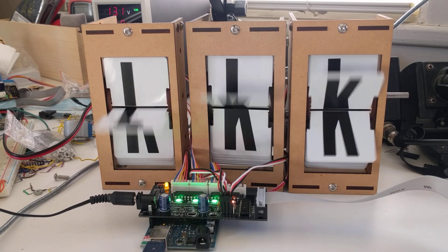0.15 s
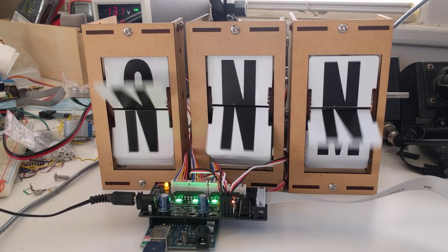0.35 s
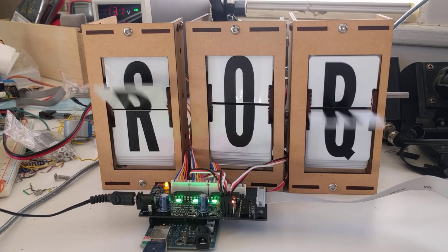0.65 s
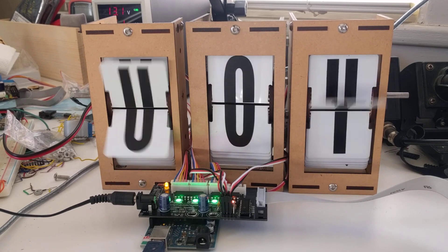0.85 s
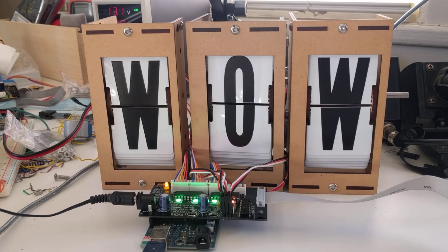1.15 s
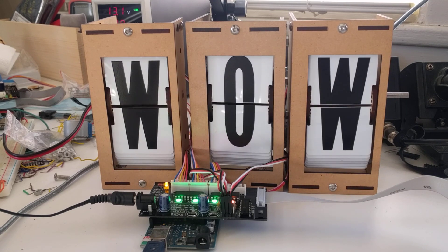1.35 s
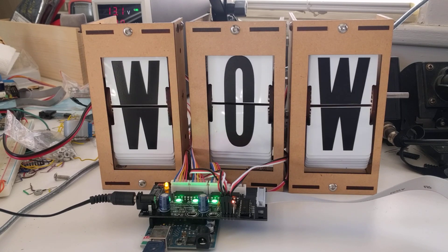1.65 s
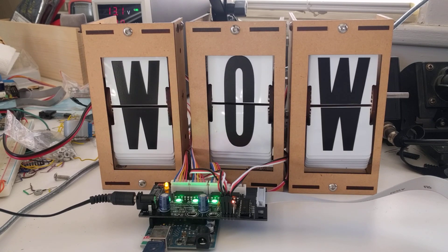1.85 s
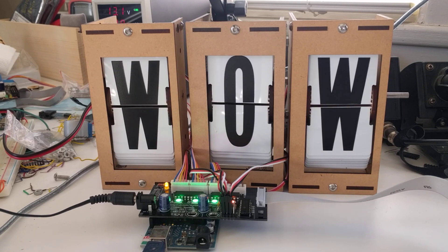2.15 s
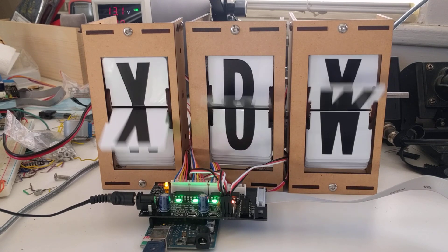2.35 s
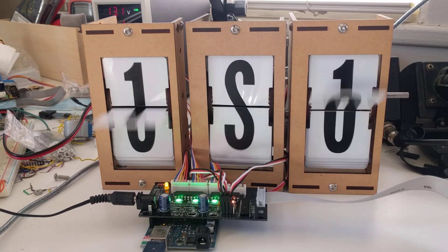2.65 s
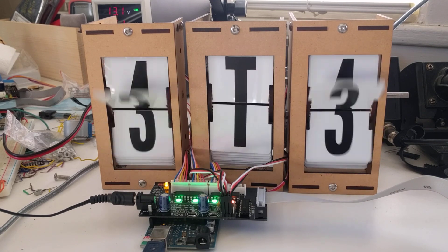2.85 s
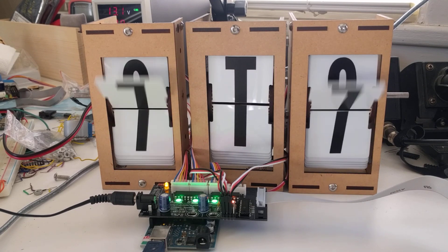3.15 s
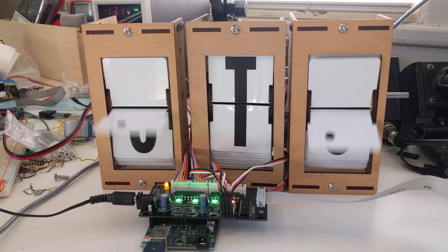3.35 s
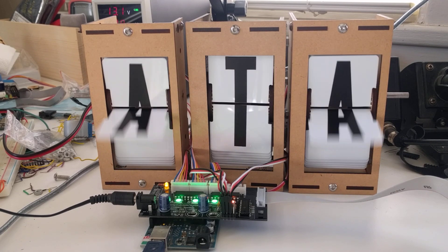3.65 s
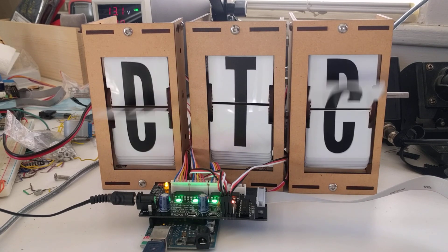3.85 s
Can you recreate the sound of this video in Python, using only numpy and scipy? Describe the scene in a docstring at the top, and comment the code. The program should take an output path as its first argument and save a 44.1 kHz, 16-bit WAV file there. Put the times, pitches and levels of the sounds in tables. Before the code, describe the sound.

Fast, crisp split-flap clatter runs down to near silence, then clacks and whirs back up

```python
"""Split-flap modules on a workbench

Three split-flap modules in fibreboard cases in a small room, the microphone close by.
Stiff plastic flaps slip off a catch: each slap is a contact noise with ringing modes and a case knock.
The motors hum in case resonances; loose flaps rattle on the drums, made of dense random ticks.
The modules run down, rest for a second, then groan and clack into motion and spin again."""
import sys
import numpy as np
from scipy import signal
from scipy.fft import rfft, irfft, next_fast_len
from scipy.io import wavfile
from scipy.ndimage import uniform_filter1d, map_coordinates

SR = 44100
rng = np.random.default_rng(int(sys.argv[2]) if len(sys.argv) > 2 else 0)


def transcribe(signal):
    """Save signal, clipped to [-1, 1], as a 16-bit WAV file at the path in sys.argv[1]."""
    frames = np.atleast_2d(signal).T
    limited = np.clip(frames, -1, 1)
    pcm = np.round(limited * 32767).astype(np.int16)
    wavfile.write(sys.argv[1], SR, pcm)


N = 176400  # samples: 4 s


def amp(db):
    """Decibels to gain."""
    return 10 ** (np.asarray(db) / 20)


def unit(x):
    """Scale to rms 1."""
    return x / np.sqrt(np.mean(x ** 2) + 1e-20)


def along(points, hz):
    """Read (frequency, value) points on a log frequency axis."""
    f, v = np.transpose(points)
    return np.interp(np.log(hz + 1), np.log(f + 1), v)


def wobble(rate):
    """A smooth random curve with rate knots a second."""
    knots = rng.standard_normal(int(N * rate / SR) + 4)
    return map_coordinates(knots, [np.arange(N) * rate / SR])


def filtered(x, response):
    """Multiply the spectrum of x by a response of frequency."""
    m = next_fast_len(N + SR // 2)
    return irfft(rfft(x, m) * response(np.fft.rfftfreq(m, 1 / SR)), m)[:N]


def coloured(x, points):
    """Filter x by the given colour and scale it to rms 1."""
    return unit(filtered(x, lambda hz: amp(along(points, hz))))


def hit_time(size=4096):
    """Time axis of one blow, in seconds."""
    return np.arange(size) / SR


def fade(t, t60):
    """Exponential decay by 60 dB in t60 seconds, starting at t = 0."""
    return (t >= 0) * np.exp(-np.log(1000) * np.abs(t) / t60)


def burst(t, t60):
    """Noise that dies away, as from a rough contact."""
    return rng.standard_normal(len(t)) * fade(t, t60)


def impulse(t, s):
    """One hard contact at time s, as a windowed sinc."""
    x = (t - s) * SR
    return np.sinc(x) * np.exp(-(x / 10) ** 2)


def body(x, points):
    """Pass a short blow through a causal (minimum-phase) colour of unit power."""
    hz = np.fft.rfftfreq(len(x), 1 / SR)
    cepstrum = irfft(np.log(unit(amp(along(points, hz))) + 1e-6))
    # fold the cepstrum onto positive time
    cepstrum[1:len(x) // 2] *= 2
    cepstrum[len(x) // 2 + 1:] = 0
    return irfft(rfft(x) * np.exp(rfft(cepstrum)))


def add(track, s, db, blow, size=140):
    """Add a blow at s seconds, its first size samples having the given rms level."""
    part = track[round(s * SR):][:len(blow)]
    part += amp(db) * blow[:len(part)] / np.sqrt(np.mean(blow[:size] ** 2))


# Colour of the quiet room's noise: pitch_hz, level_db
AIR_COLOUR = [(25, -25.5), (59, -2), (82, -16.5), (119, -7), (152, -14), (233, -13.5), (567, -23),
              (762, -25.5), (8350, -36.5), (15500, -31.5)]
AIR_DB = -60.5
HUM_HZ, HUM_DB = 58.7, -66.5  # mean pitch; peak level of the fundamental


def air():
    """Room noise with a low hum and its octave, their phase drifting slowly."""
    phase = 2 * np.pi * HUM_HZ * np.arange(N) / SR + wobble(2.0)
    hum = np.sin(phase) + .5 * np.sin(2 * phase)
    return amp(AIR_DB) * coloured(rng.standard_normal(N), AIR_COLOUR) + amp(HUM_DB) * hum


# Decay of the small room: pitch_hz, t60_s
ROOM_DECAY = [(100, .4), (1500, 0.68), (4000, 0.47), (8500, 0.5)]
ROOM_DB, ROOM_RISE_S = -17, 0.0052


def room(x, count=16):
    """Diffuse tail, a new one for each stretch of sound; each frequency dies at its own speed."""
    out = np.zeros(N + SR)
    for part in np.array_split(np.arange(N), count):
        hz, t, z = signal.stft(rng.standard_normal(SR // 2), SR, nperseg=256)
        decay = fade(t, along(ROOM_DECAY, hz)[:, None])
        tail = signal.istft(z * decay, SR, nperseg=256)[1]
        tail *= 1 - np.exp(-np.arange(len(tail)) / SR / ROOM_RISE_S)
        wet = signal.fftconvolve(x[part], tail / np.linalg.norm(tail))
        out[part[0]:part[0] + len(wet)] += wet
    return out[:N]


TICKS_PER_S, TICK_SPREAD_DB, TICK_T60_S = 1000, 4, 0.006  # mean rate; standard deviation; decay


def ticks():
    """A dense random train of tiny scraping contacts of uneven size."""
    sizes = (rng.random(N) < TICKS_PER_S / SR) * amp(TICK_SPREAD_DB * rng.standard_normal(N))
    power = signal.fftconvolve(sizes ** 2, fade(hit_time(), TICK_T60_S) ** 2)[:N]
    return np.sqrt(np.abs(power)) * rng.standard_normal(N)


def patchy(x, depth_db, size):
    """Let bands swell and fade at random; a short frame gives brief, wide patches."""
    z = signal.stft(x, nperseg=size)[2]
    field = uniform_filter1d(rng.standard_normal(z.shape), size=4, axis=0)
    field = uniform_filter1d(field, size=7, axis=1)
    return signal.istft(z * amp(depth_db * unit(field)), nperseg=size)[1][:N]


def resonance(hz, width):
    """Noise in one resonance, at rms 1."""
    return unit(filtered(rng.standard_normal(N), lambda f: 1 / (1 + ((f - hz) / width) ** 2)))


STIR_DB, STIR_T60_S = -1, .16  # extra rustle from a slap of rms-average edge, before levelling; its decay


def stir():
    """Gain on the rustle, rms 1: each slap shakes the loose flaps, and the flare then decays."""
    s, _, edge_db, _ = np.transpose(FLAPS)
    shakes = np.bincount(np.round(s * SR).astype(int), unit(amp(edge_db)), N)
    flare = signal.fftconvolve(shakes, fade(np.arange(N) / SR, STIR_T60_S))[:N]
    return unit(1 + amp(STIR_DB) * flare)


# Activity of the drums, levels before the fast swing: time_s, rumble_level_db, rustle_level_db
DRIVE = [(0, -38.5, -38), (.5, -40.5, -41.5), (1.0, -39, -40), (1.191, -41, -46), (1.255, -43, -50.5),
         (1.3, -58.5, -66), (1.42, -78, -90), (2.3, -82, -83), (2.32, -62, -67), (2.385, -56, -62),
         (2.41, -52.5, -56), (2.46, -47, -53), (2.55, -38, -41), (2.8, -39, -41), (4, -39.5, -41)]
# Colours of the case rumble and of the flap rustle: pitch_hz, level_db
RUMBLE = [(25, -28.5), (55, -4.5), (90, -5.5), (130, -3.5), (250, -3.5), (500, -1.5), (800, 1.5),
          (1050, -8), (1350, -0.5), (1900, -4), (2600, -11.5), (5000, -10), (16000, -51)]
RUSTLE = [(500, -12.5), (2000, -0.5), (3400, 1.5), (4700, -0.5), (6800, -1.5), (8000, -1), (9500, -5),
          (12000, -4), (15500, -1.5), (16500, -27)]
# Case resonances shaken by the motors: pitch_hz, width_hz (pitch to half amplitude),
# level_db (relative to the rumble level)
CASE_HUM = [(124.7, 8.1, -14.5), (202.6, 8.5, -15.5), (296, 26, -14), (889, 93, -13), (1380, 110, -20),
            (1850, 130, -17.5)]
RUMBLE_PATCH_DB, RUSTLE_PATCH_DB = 1, 3  # how far the bands swell and fade
RUMBLE_SWING_DB, RUSTLE_SWING_DB = 1.0, 2.2  # depth of the shared random swing


def drums():
    """The motors shake the cases while the loose flaps rustle on the turning drums."""
    s, rumble_db, rustle_db = np.transpose(DRIVE)
    t, jolt = np.arange(N) / SR, wobble(70)
    rumble = coloured(patchy(ticks(), RUMBLE_PATCH_DB, size=1024), RUMBLE)
    rumble *= amp(RUMBLE_SWING_DB * jolt)
    hum = sum(amp(db) * resonance(hz, width) for hz, width, db in CASE_HUM)
    rustle = coloured(patchy(ticks(), RUSTLE_PATCH_DB, size=128), RUSTLE)
    rustle *= amp(RUSTLE_SWING_DB * jolt) * stir()
    case_gain = amp(np.interp(t, s, rumble_db))
    rustle_gain = amp(np.interp(t, s, rustle_db))
    return case_gain * (rumble + hum) + rustle_gain * rustle


# Colour of a dull bump and of the case's shudder: pitch_hz, level_db
BUMP_COLOUR = [(25, -29.5), (60, -6.5), (130, 0.5), (350, 1), (750, -3), (1300, -18), (5000, -54)]
START_S, START_DB, START_HZ, START_T60_S = 2.316, -45.5, 197, 0.62  # level of the shudder at its start
START_RING_DB, START_RISE_S = 3.5, 0.018  # level of the low mode relative to the shudder; its build-up


def groan():
    """The motors engage, setting the case shuddering while a low mode of it, near 200 Hz, builds up."""
    t = np.arange(N) / SR - START_S
    build_up = 1 - np.exp(-np.abs(t) / START_RISE_S)
    mode = build_up * np.sin(2 * np.pi * START_HZ * t + .5 * wobble(40))
    shudder = coloured(rng.standard_normal(N), BUMP_COLOUR)
    return amp(START_DB) * (amp(START_RING_DB) * mode + shudder) * fade(t, START_T60_S)


# Clacks of the drive as it starts: start_s, level_db
CLACKS = [(2.3151, -39.5), (2.4, -31), (2.4496, -32), (2.4595, -27), (2.5, -35.5), (2.509, -30.5)]
# Dull bumps of the cases: start_s, level_db
BUMPS = [(0.265, -39), (1.141, -36.5), (1.252, -42), (3.27, -36.5), (3.36, -40), (3.616, -33.5)]
# Colour of a drive clack: pitch_hz, level_db
CLACK_COLOUR = [(60, -11), (200, -3), (800, 4), (1800, 4.5), (4000, 1.5), (9000, -6), (16000, -17)]
CLACK_T60_S, BUMP_T60_S = 0.036, 0.043


def cases():
    """Start-up clacks of the drive and dull bumps of the cases, as short coloured noise."""
    out, t = np.zeros(N), hit_time()
    for s, db in CLACKS:
        add(out, s, db, body(burst(t, CLACK_T60_S), CLACK_COLOUR))
    for s, db in BUMPS:
        add(out, s, db, body(burst(t, BUMP_T60_S), BUMP_COLOUR), size=500)
    return out


# delay of the hard strike after the contact begins, also the onset time; its level over the scrape
STRIKE_S, STRIKE_DB = 0.00032, 4
MODE_SCATTER_DB, MODE_DETUNE = 4, .025  # standard deviations; detuning as a fraction of the pitch


def attack(t):
    """Soft onset of a contact, at the pace of the strike."""
    return 1 - np.exp(-t / STRIKE_S)


def ringing(t, modes):
    """Damped modes, struck a little differently every time."""
    out = np.zeros(len(t))
    for hz, level, t60 in modes:
        gain = amp(level + rng.normal(0, MODE_SCATTER_DB))
        pitch = hz * rng.normal(1, MODE_DETUNE)
        phase = 2 * np.pi * (pitch * t + rng.random())
        out += gain * fade(t, t60) * np.sin(phase)
    return attack(t) * out


# Flap slaps, levels before the trim below: start_s, ring_level_db (flap's face),
# edge_level_db (crisp edge), knock_level_db (case)
FLAPS = [(0.0254, -25.5, -24.5, -27.5), (0.0313, -29.5, -25.5, -36.5), (0.064, -29, -26.5, -34.5),
         (0.095, -21.0, -21.5, -34.5), (0.1112, -19, -24, -34.5), (0.1349, -29.5, -23.5, -40),
         (0.1598, -31.5, -37.5, -28), (0.1713, -26, -27, -31.5), (0.188, -24.5, -23.5, -31),
         (0.209, -22.5, -22.5, -32.0), (0.2376, -25, -26.5, -32), (0.2647, -24.5, -22.5, -31.5),
         (0.288, -26, -24, -33.5), (0.3143, -22, -23.5, -26.5), (0.3318, -18, -21.5, -39.5),
         (0.3584, -24.5, -21, -31.5), (0.3874, -34.5, -37, -38), (0.3939, -23, -24, -33),
         (0.4095, -22.5, -25.5, -32.5), (0.4375, -19.5, -24.0, -31), (0.4747, -26, -26.5, -33.5),
         (0.485, -20.5, -21.5, -36.5), (0.5065, -23.5, -25.5, -29.5), (0.5452, -20.5, -19.5, -29.0),
         (0.5863, -21.0, -22, -30.5), (0.6182, -21.5, -23, -27.0), (0.6619, -25.0, -25, -33.5),
         (0.6944, -25, -25, -29.5), (0.7413, -23, -24.5, -34.5), (0.7687, -24, -22, -27.5),
         (0.824, -23.5, -22, -30.0), (0.8462, -23.5, -25.5, -31.5), (0.8977, -24.0, -22.5, -36.5),
         (0.9105, -24.0, -24, -28), (0.9651, -22.5, -20, -32.5), (0.989, -26.5, -29.5, -28.5),
         (1.0363, -26.0, -25.5, -32.0), (1.0652, -24, -26.5, -33.5), (1.1143, -23, -28.0, -35),
         (1.1635, -27.5, -27.5, -32.5), (1.2173, -33, -36, -43.5), (1.2278, -30, -26, -40),
         (2.5361, -26.5, -26.5, -28.0), (2.5668, -22.5, -22, -32.5), (2.5884, -25, -24, -37),
         (2.6194, -24.5, -29, -31.0), (2.6221, -26, -36, -32), (2.6482, -23, -25.5, -32.5),
         (2.6502, -20.5, -19.5, -29), (2.6825, -36.5, -38, -33.5), (2.7015, -27.0, -26.5, -30),
         (2.7239, -26.5, -28.5, -32.5), (2.7298, -26, -25, -30.5), (2.7792, -19, -25.5, -34.0),
         (2.7992, -21.0, -22.5, -32.5), (2.8071, -29.5, -26.5, -41), (2.833, -33.5, -32, -35.5),
         (2.8502, -24.5, -26.0, -28.0), (2.876, -19, -19.0, -30), (2.9343, -26.5, -26, -30.0),
         (2.9364, -22, -26.5, -29), (2.9695, -26, -24.5, -37), (3.0044, -16.0, -20.5, -28.0),
         (3.0094, -23, -25, -41), (3.0443, -34, -37, -32.5), (3.07, -23.0, -23, -26.5),
         (3.0755, -24.5, -23.5, -34), (3.1195, -30.0, -37, -30.5), (3.1566, -21.5, -22.5, -35),
         (3.1601, -27, -26, -31.5), (3.1928, -34.0, -32.5, -33.5), (3.2252, -23.5, -24.0, -27.5),
         (3.2332, -22.5, -25.5, -38), (3.2367, -26.5, -32, -38.5), (3.2684, -36, -34, -32),
         (3.2992, -26, -25, -30.5), (3.3046, -29, -31, -31.5), (3.3488, -34.5, -36.5, -31),
         (3.3767, -24, -21.0, -31), (3.3841, -29.5, -28, -29), (3.455, -26, -21, -34.5),
         (3.4729, -26.0, -28, -32.5), (3.536, -24.5, -26, -30.5), (3.5466, -23, -23.5, -35),
         (3.6236, -29, -27, -31.5), (3.6292, -26.0, -28, -31.5), (3.6929, -31.0, -28, -30),
         (3.6956, -26.5, -25.5, -28.5), (3.7299, -27, -30.5, -31), (3.7687, -22, -21, -26),
         (3.808, -35, -35.5, -37), (3.842, -19.5, -23.5, -26), (3.8842, -40, -37, -36),
         (3.9132, -12.5, -15.5, -21.5), (3.9714, -32.5, -30.5, -31.5), (3.9873, -23, -22.5, -30)]
# Faint ticks of a resting flap that settles: start_s, level_db
SETTLES = [(1.9925, -57.5), (2.285, -64.5)]
# Colours of the flap's face, of its edge and of the case knock: pitch_hz, level_db
FACE_COLOUR = [(1500, -26), (3300, -10), (4200, -1.5), (6800, 3), (8000, -2.5), (9500, -23.5)]
EDGE_COLOUR = [(6000, -24), (8200, -0.5), (9500, 0.5), (12000, -5.5), (15500, -0.5), (16500, -13.5)]
KNOCK_COLOUR = [(80, -23.5), (300, -11), (800, -1), (1900, 3.5), (3200, -2.5), (6000, -19.5)]
# Mean modes of the flap's face, of its edge and of the case: pitch_hz, level_db, t60_s
FACE_MODES = [(4540, -22, 0.0099), (5560, -15.5, .006), (6166, -12, .007), (6954, -10, 0.01)]
EDGE_MODES = [(9380, -12.5, 0.0059), (13730, -16, 0.0043), (14980, -19.5, 0.0042)]
CASE_MODES = [(840, -39, .022), (1250, -36, 0.015), (1790, -32, 0.042)]
FLAP_TRIM_DB = 0.5  # added to the face and edge levels
SNAP_T60_S, CASE_T60_S, CASE_DB = 0.004, 0.031, -13.5  # the contact; its echo inside the case
BOUNCE_S, BOUNCE_DB = .0035, -10  # rebound delay before its random scaling; level
WALL_S, WALL_DB = 0.001577, -4  # return from the case wall: delay before its random scaling; level
KNOCK_RING_DB, KNOCK_T60_S = -17, 0.023  # diffuse ring of the case under the knock


def flaps():
    """Flaps smack, scrape and rebound, ringing face and edge and knocking the case; resting ones tick."""
    out, t = np.zeros(N), hit_time()
    strike = impulse(t, STRIKE_S)
    for s, face_db, edge_db, knock_db in FLAPS:
        bounce_s = BOUNCE_S * rng.uniform(0.54, 1.3)
        rebound = amp(BOUNCE_DB) * burst(t - bounce_s, SNAP_T60_S)
        case_echo = amp(CASE_DB) * burst(t, CASE_T60_S)
        scrape = attack(t) * (burst(t, SNAP_T60_S) + rebound + case_echo)
        contact = amp(STRIKE_DB) * strike + scrape
        wall_s = STRIKE_S + WALL_S * rng.uniform(.5, 1.53)
        wall_return = amp(WALL_DB) * impulse(t, wall_s)
        knock = strike + wall_return + amp(KNOCK_RING_DB) * burst(t, KNOCK_T60_S)
        face_blow = .5 * body(contact, FACE_COLOUR) + ringing(t, FACE_MODES)
        edge_blow = .5 * body(contact, EDGE_COLOUR) + ringing(t, EDGE_MODES)
        case_blow = .5 * body(knock, KNOCK_COLOUR) + ringing(t, CASE_MODES)
        add(out, s, FLAP_TRIM_DB + face_db, face_blow, size=300)
        add(out, s, FLAP_TRIM_DB + edge_db, edge_blow, size=300)
        add(out, s, knock_db, case_blow, size=300)
    for s, db in SETTLES:
        add(out, s, db, body(burst(t, SNAP_T60_S), EDGE_COLOUR))
    return out


def scene():
    """The modules on the bench, their room tail and the quiet room."""
    modules = drums() + groan() + cases() + flaps()
    return (modules + amp(ROOM_DB) * room(modules) + air())[None]


CEILING, TOP_HZ = .72, 16200  # level the rounded peaks approach (full scale 1); band limit


def record(dry):
    """The recorder rounds the highest peaks and keeps nothing above its band limit."""
    rounded = dry[0] / (1 + np.abs(dry[0] / CEILING) ** 5) ** (1 / 5)
    return filtered(rounded, lambda hz: hz < TOP_HZ)[None]


dry = scene()
out = record(dry)
transcribe(out)
```